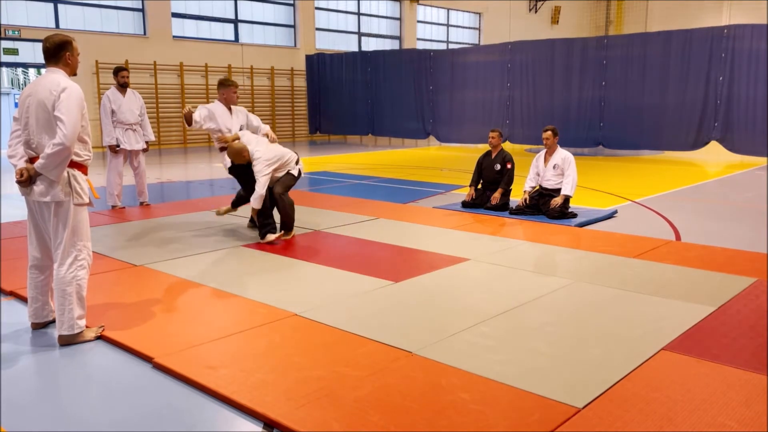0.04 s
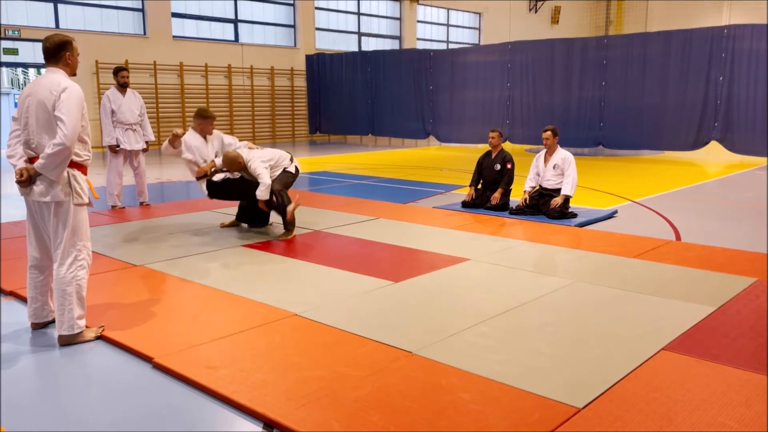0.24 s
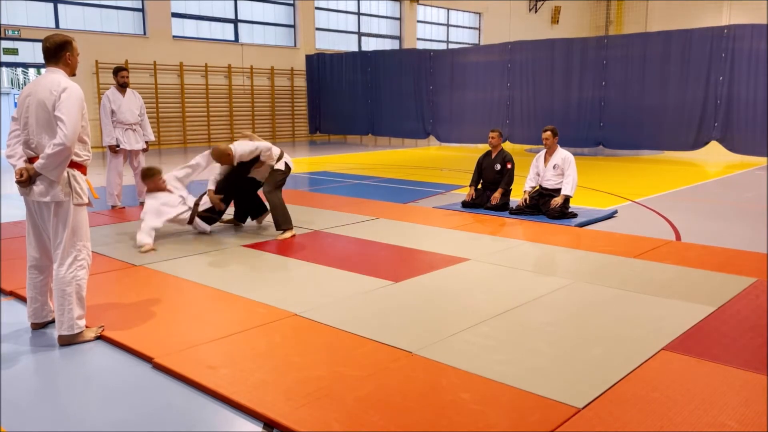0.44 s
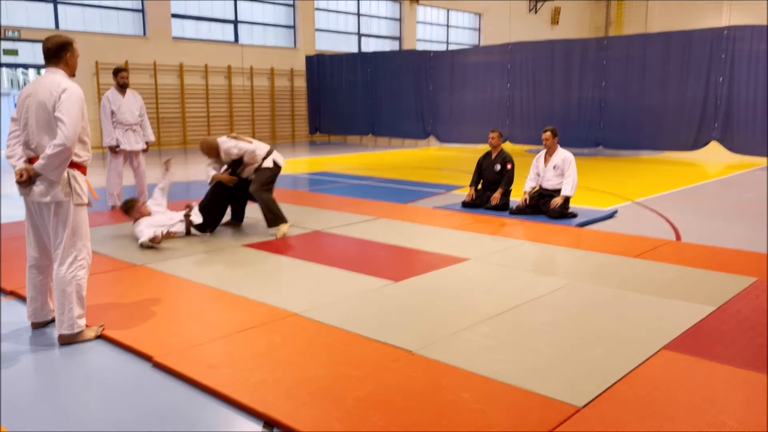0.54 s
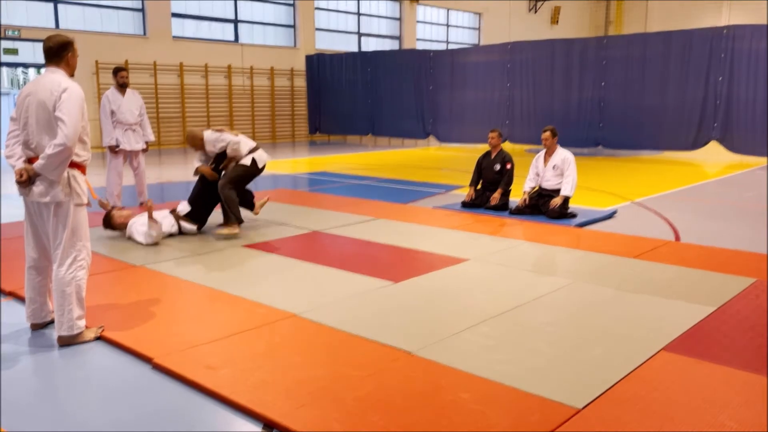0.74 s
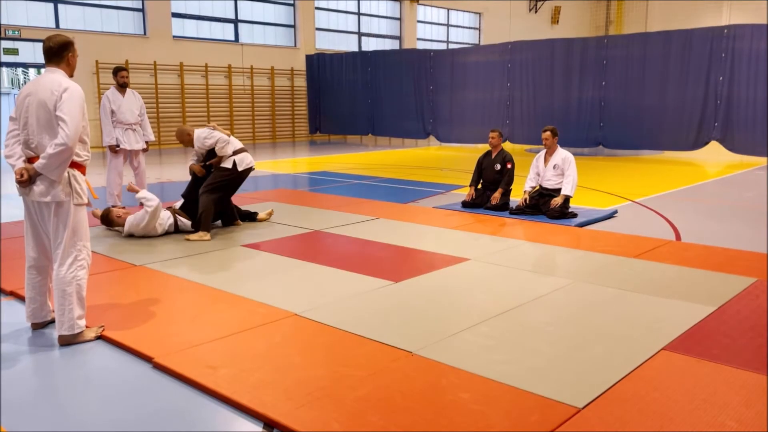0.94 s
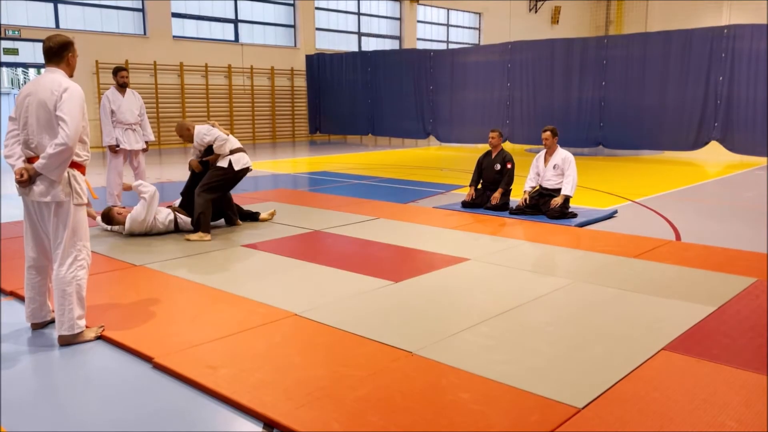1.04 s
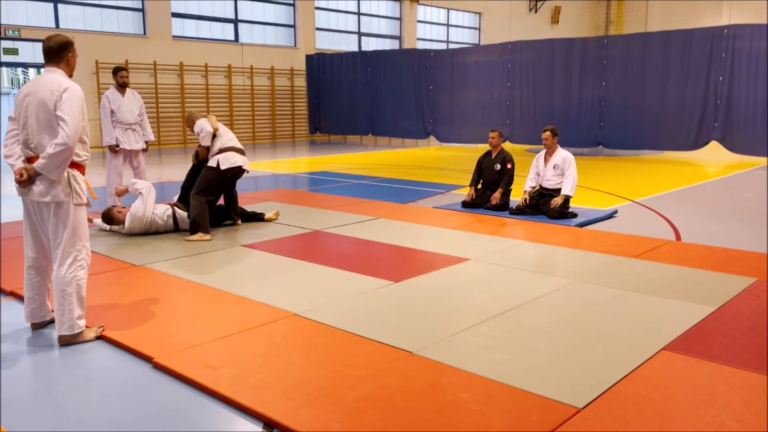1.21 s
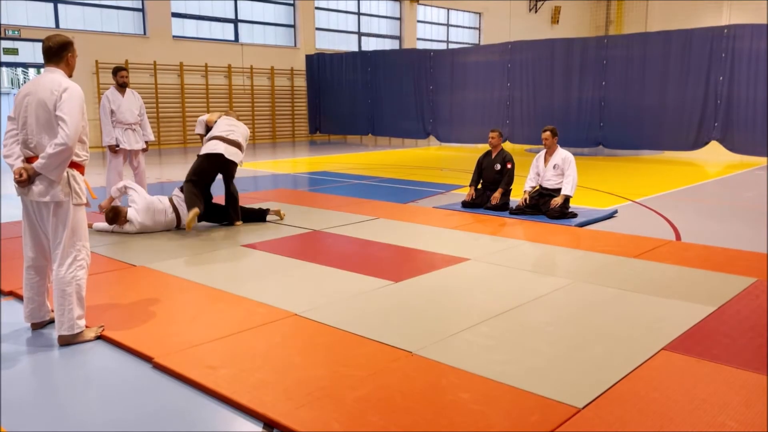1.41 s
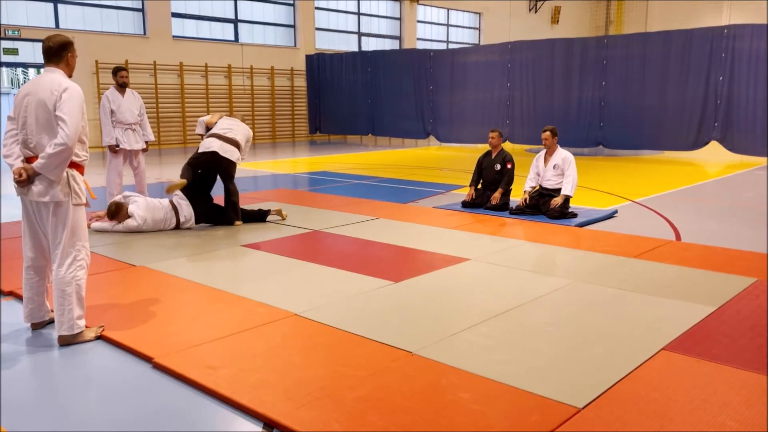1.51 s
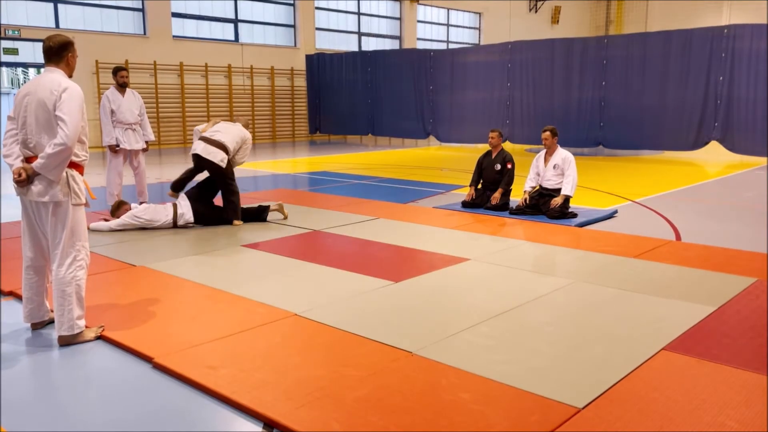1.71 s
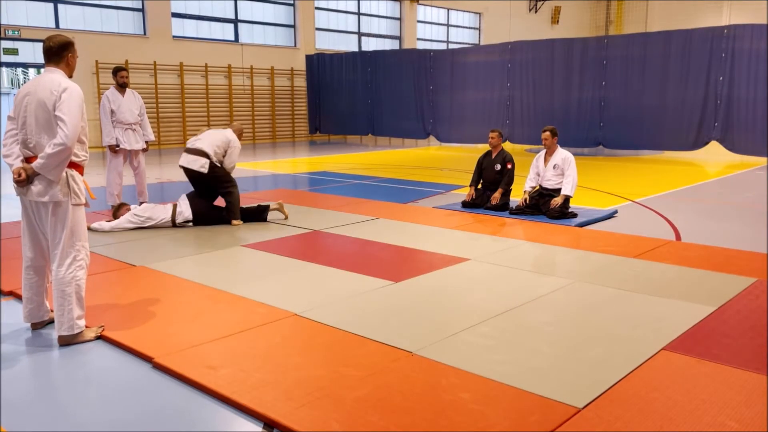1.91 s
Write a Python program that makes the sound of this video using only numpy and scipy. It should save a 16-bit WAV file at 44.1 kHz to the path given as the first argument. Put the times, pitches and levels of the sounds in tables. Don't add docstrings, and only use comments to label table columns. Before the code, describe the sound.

A body falls flat on padded mats, heard in stereo from across a large sports hall. Cloth swishes at about 0.1-0.2 s, then at 0.22 s a sharp arm slap cracks with a mat knock and deep sprung-floor boom. Duller wall returns follow within 0.15 s, and a long echo slowly fades. Soft thuds at 0.44 and 0.63 s, then fainter ones and light cloth rustles, over faint room air.

```python
import sys
import numpy as np
from scipy import signal
from scipy.fft import rfft, irfft, next_fast_len
from scipy.io import wavfile
from scipy.ndimage import uniform_filter1d

SR = 44100
rng = np.random.default_rng(int(sys.argv[2]) if len(sys.argv) > 2 else 0)


def inscribe(sig):
    pcm = np.round(np.clip(np.atleast_2d(sig).T, -1, 1) * 32767)
    wavfile.write(sys.argv[1], SR, pcm.astype(np.int16))


def decibels_to_gain(level_db):
    exponent = np.asarray(level_db, float) / 20
    return 10 ** exponent


N = 85995

# frequency in Hz, level in dB per Hz.
AIR_COLOUR = [(25, -2), (55, 8.5), (260, -4), (500, -9), (960, -7), (3000, -23), (7000, -31), (16000, -60)]
# start in seconds, length in seconds, level in dB, centre in Hz,
# half-width as a share of the centre.
SWISHES = [(0.094, 0.25, -66, 5500, .85), (.17, 0.12, -46.5, 835, 0.93), (.184, 0.017, -42, 980, 0.15),
           (.69, 0.055, -63, 10900, 0.27), (.98, 0.25, -66, 10400, 0.75), (1.15, 0.064, -66.5, 10500, 0.53),
           (1.36, 0.17, -91, 10100, 0.38), (1.592, 0.0046, -61.5, 9500, .4),
           (1.61, 0.073, -58.5, 7200, 0.18), (1.71, 0.074, -66.5, 10800, .3), (1.66, 0.25, -63, 7550, 0.2)]
# time in seconds, thud level in dB, slap level in dB,
# how far the left ear leads in ms.
ARRIVALS = [
    (.2243, -0.5, -3, .2),
    (0.2594, -23, -33, -0.41),
    (.2670, -18.5, -17, 0.072),
    (.2770, -11.5, -25.5, .0),
    (.2930, -13.5, -20, -0.28),
    (.3120, -15.5, -57, 0.028),
    (.3540, -13.5, -44, 0.),
    (.3770, -26, -48, -0.11),
]
# time after first touch in ms, level in dB.
CONTACTS = [
    (0., -9),
    (.4, 0),
    (.9, -4),
    (1.25, 0),
    (2.0, -3),
    (2.3, -8),
    (4.2, -14),
    (6.6, -17),
]
# frequency in Hz, level in dB per Hz.
SKIN_COLOUR = [(240, -29), (500, -13), (1100, 6.5), (2500, -2.5), (6200, -2.5), (8200, -5.5), (11400, -11),
               (16300, -11)]
# frequency in Hz, width in Hz, level in dB.
SKIN_RINGS = [(1300, 270, -6), (2450, 410, 6), (3390, 730, 12.5), (5300, 4500, -6), (10760, 1500, 1)]
# delay in seconds, start pitch in Hz, end pitch in Hz, level in dB,
# time to fall 60 dB in seconds.
THUD_TONES = [
    (0.00315, 258, 150, -3, 0.052),
    (0.00545, 107.4, 50, -7, 0.15),
    (0.014, 97, 58, -19, .15),
    (0.00407, 666, 990, -25.5, 0.1),
    (0.00366, 940, 1200, -26, 0.064),
]
# frequency in Hz, width in Hz, level in dB.
WALL_RING = (1100, 200, 8.2)
# frequency in Hz, level in dB per Hz.
LOW_COLOUR = [(15, -58), (30, -27), (55, -3), (170, -7.5), (253, -6.5), (330, -12), (448, -14),
              (700, -27.5)]
# frequency in Hz, level in dB per Hz.
HIGH_COLOUR = [(410, -20), (700, 1), (1440, -4.5), (2050, -17), (3410, -15.5), (7290, -19.5),
               (10100, -27.5), (12600, -32.5), (16000, -84)]
# frequency in Hz, time to fall 60 dB in seconds.
HALL_FADE = [(50, 1.35), (110, 3.14), (240, 4.23), (600, 5.43), (1500, 5.33), (4000, 3.46), (8000, 1.54),
             (14000, 1.13)]
# frequency in Hz, width in Hz, level in dB.
ROOM_TONES = [(63, 26.6, 4.5), (86.5, 7.7, -4), (240.8, 120, -10.5)]
# frequency in Hz, width in Hz, level in dB.
PANEL_TONES = [(1274, 67, -10.5), (1495, 71, -16), (2427, 300, 3.5), (3354, 450, -2), (5370, 1200, 1.5)]
# start in seconds, floor boom level in dB, mat knock level in dB.
STEPS = [(0.441, -11.5, -20.5), (0.632, -14, -23.5), (0.714, -25, -40), (0.789, -22, -28),
         (.93, -19.5, -31), (0.976, -32, -25), (1.014, -26, -51), (1.078, -26, -47), (1.23, -38.5, -34),
         (1.419, -26, -40), (1.58, -26, -40), (1.669, -32.5, -29.5), (1.722, -31, -47), (1.894, -57, -26.5)]
# frequency in Hz, likeness from -1 to 1.
LIKENESS = [(60, 1), (290, 0.69), (640, -0.23), (3100, 0.63), (7400, -0.92), (9900, 0.66), (12000, 0.56),
            (14500, -.7)]
# frequency in Hz, left minus right in dB.
SPREAD_PAN = [(60, -0.5), (180, 0), (550, 2), (1650, 1.0), (4970, 2.5), (15000, -2)]
# frequency in Hz, left minus right in dB.
NEAR_PAN = [(500, 1), (2500, 8), (5000, 3), (9000, -2)]
# frequency in Hz, left lead in radians.
PORT_LEAD = [(300, -2), (3000, 3.7), (4300, 0.2), (7200, -2), (10500, -6.2), (14500, -9), (16000, -10)]


def read(points, hz):
    f, value = np.transpose(points)
    return np.interp(np.log(hz + 1), np.log(f + 1), value)


def ridges(peaks, hz):
    return 1 + sum(decibels_to_gain(db) / (1 + (2 * (abs(hz) - f) / width) ** 2) for f, width, db in peaks)


def evened(x):
    return x / np.sqrt(np.mean(x ** 2) + 1e-20)


def add(mix, s, sound, lead_ms=0., pan_db=0.):
    for ch, side in enumerate((-.5, .5)):
        part = mix[ch, round((s + side * lead_ms / 1000) * SR):][:len(sound)]
        part += decibels_to_gain(-side * pan_db) * sound[:len(part)]


def add_near(mix, s, sound):
    margin = 128
    n = next_fast_len(len(sound) + 2 * margin)
    hz = np.fft.rfftfreq(n, 1 / SR)
    for ch, side in enumerate((.5, -.5)):
        turn = side * read(PORT_LEAD, hz) - 2 * np.pi * hz * margin / SR
        gain = decibels_to_gain(side * read(NEAR_PAN, hz)) * np.exp(1j * turn)
        part = mix[ch, round(s * SR) - margin:][:n]
        part += irfft(rfft(sound, n) * gain, n)[:len(part)]


def diffuse(colour, size, decay, peaks=()):
    hop = size // 4
    hz = np.fft.rfftfreq(size, 1 / SR)[:, None]
    t = np.arange(N // hop + 5) * hop / SR
    a, b, c, d = rng.standard_normal((len(t), len(hz), 4)).T
    shared, own = a + 1j * b, c + 1j * d
    same = np.clip(read(LIKENESS, hz), -1, 1)
    pan = read(SPREAD_PAN, hz) / 2
    left = shared * decibels_to_gain(pan)
    right = (same * shared + np.sqrt(1 - same ** 2) * own) * decibels_to_gain(-pan)
    inside = (hz >= colour[0][0]) & (hz <= colour[-1][0])
    streaks = decibels_to_gain(2.0 * rng.standard_normal(hz.shape))
    gain = decibels_to_gain(read(colour, hz)) * inside * ridges(peaks, hz) * streaks
    scale = np.sqrt(np.sum(gain ** 2) * 4) * np.sqrt(2 / 3)
    spectra = np.array([left, right]) * gain * decibels_to_gain(decay(hz, t))
    noise = signal.istft(spectra, nperseg=size, noverlap=size - hop)[1]
    return noise[:, :N] * 2 / scale


def air():
    return decibels_to_gain(-48.5) * diffuse(AIR_COLOUR, size=1024, decay=lambda hz, t: 0 * t)


def swish(length, db, hz, width):
    n, width = round(length * SR) + 64, np.clip(width, .05, .9)
    noise = rng.standard_normal(12000)[:n]
    grain_db = evened(uniform_filter1d(rng.standard_normal(12000), 60))[:n]
    edges = [hz * (1 - width), min(hz * (1 + width), 18000)]
    band = signal.butter(2, edges, "bp", fs=SR, output="sos")
    swell = np.sin(np.pi * np.linspace(0, 1, n) ** 0.49) ** 2
    return decibels_to_gain(db) * evened(signal.sosfilt(band, noise * decibels_to_gain(grain_db))) * swell


def slap():
    hold_s, after_db, after_t60 = 0.0029, -11.5, 0.038
    t = np.arange(2048) / SR
    shape = np.where(t < hold_s, 1, decibels_to_gain(after_db - 60 * (t - hold_s) / after_t60))
    drive = decibels_to_gain(-10) * rng.standard_normal(len(t)) * shape
    for ms, db in CONTACTS:
        drive -= decibels_to_gain(db) * np.sinc((t - ms / 1000) * SR - 4)
    hz = np.fft.fftfreq(4096, 1 / SR)
    gain = decibels_to_gain(read(SKIN_COLOUR, abs(hz))) * ridges(SKIN_RINGS, hz)
    phase = -signal.hilbert(np.log(gain + 1e-5)).imag
    skin = np.fft.ifft(gain * np.exp(1j * phase)).real[:1024]
    out = np.convolve(drive, skin)
    return out / abs(out).max()


def thud():
    rise_s, sag_s = 0.0019, 0.045
    t = np.arange(round(.3 * SR)) / SR
    out = np.zeros(len(t))
    for delay, hz0, hz1, db, t60 in THUD_TONES:
        u = np.maximum(t - delay, 0)
        turns = hz1 * u + (hz0 - hz1) * sag_s * (1 - np.exp(-u / sag_s))
        out += decibels_to_gain(db - 60 * u / t60) * (1 - np.exp(-u / rise_s)) * np.sin(2 * np.pi * turns)
    return 2 * out


def hall():
    low_rise_s, high_rise_s = 0.013, 0.015
    start = ARRIVALS[0][0]

    def fade(hz, t):
        return -60 * np.maximum(t - start - .1, 0) / read(HALL_FADE, hz)

    u = np.maximum(np.arange(N) / SR - start, 0)
    low = decibels_to_gain(-18.5) * diffuse(LOW_COLOUR, size=4096, decay=fade, peaks=ROOM_TONES)
    high = decibels_to_gain(-30.5) * diffuse(HIGH_COLOUR, size=1024, decay=fade, peaks=PANEL_TONES)
    return low * (1 - np.exp(-(u / low_rise_s) ** 2)) + high * (1 - np.exp(-u / high_rise_s))


def heel_snap():
    width_s = .00022
    u = (np.arange(200) - 100) / SR / width_s
    return decibels_to_gain(-15) * (1 - u ** 2) * np.exp(-u ** 2 / 2)


def off_wall(crack):
    smear_s, dull_hz = 0.0057, 3590
    t = np.arange(1500) / SR
    hz, width, db = WALL_RING
    smeared = np.convolve(crack, rng.standard_normal(len(t)) * np.exp(-t / smear_s))
    out = signal.lfilter(*signal.butter(2, dull_hz, fs=SR), smeared)
    out = out + decibels_to_gain(db) * signal.lfilter(*signal.iirpeak(hz, hz / width, fs=SR), out)
    return out / abs(out).max()


def step(boom_db, knock_db):
    rise_s = 0.023
    t = np.arange(round(.3 * SR)) / SR
    boom = decibels_to_gain(boom_db - 60 * t / 0.098) * np.sin(2 * np.pi * 64 * t)
    knock = decibels_to_gain(knock_db - 60 * t / 0.11) * np.sin(2 * np.pi * 240 * t)
    return 2 * (boom + knock) * (1 - np.exp(-t / rise_s))


def scene():
    mix = np.zeros((2, N))
    boom, crack = thud(), slap()
    for k, (s, thud_db, slap_db, lead_ms) in enumerate(ARRIVALS):
        add(mix, s, decibels_to_gain(thud_db) * boom, lead_ms)
        if k == 0:
            add_near(mix, s, decibels_to_gain(slap_db) * crack)
        else:
            add(mix, s, decibels_to_gain(slap_db) * off_wall(crack), lead_ms)
    add(mix, .2372 - 100 / SR, heel_snap(), lead_ms=.1, pan_db=4.)
    for s, *row in STEPS:
        add(mix, s, step(*row))
    for s, *row in SWISHES:
        add_near(mix, s, swish(*row))
    return mix + hall() + air()


def band_limit(x):
    return signal.sosfilt(signal.butter(12, 16520, fs=SR, output="sos"), x)


def record(dry):
    ceiling = 1.3
    x = signal.sosfilt(signal.butter(3, 42, "hp", fs=SR, output="sos"), dry)
    x = ceiling * np.tanh(x / ceiling)
    top_cut = signal.firwin(511, 16300, window=("kaiser", 9), fs=SR)
    x = signal.oaconvolve(x, top_cut[None], "same")
    return band_limit(x)


dry = scene()
out = record(dry)
inscribe(out)
```